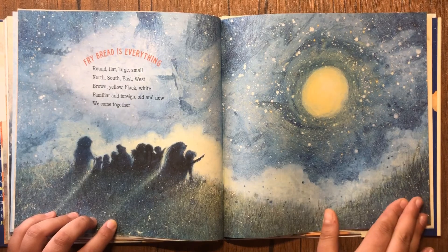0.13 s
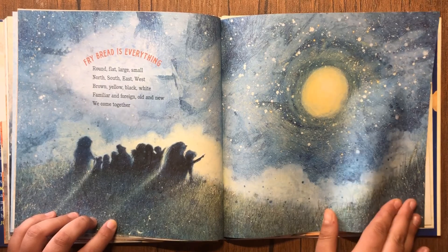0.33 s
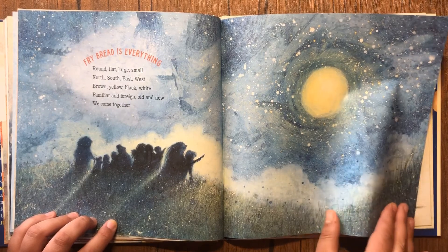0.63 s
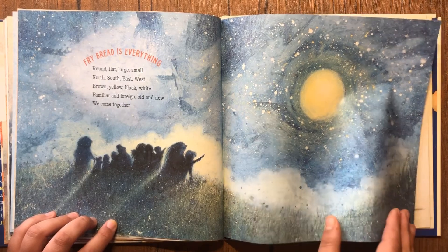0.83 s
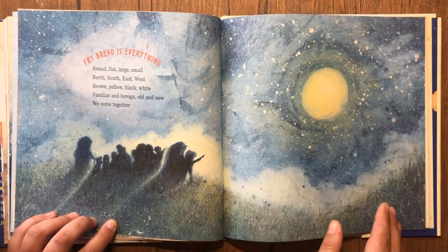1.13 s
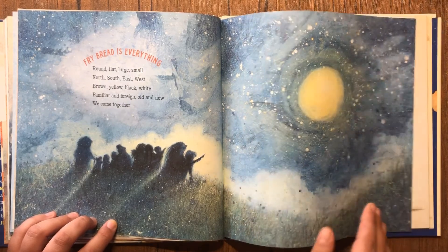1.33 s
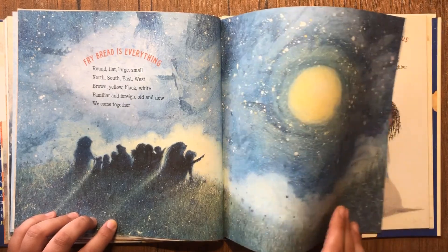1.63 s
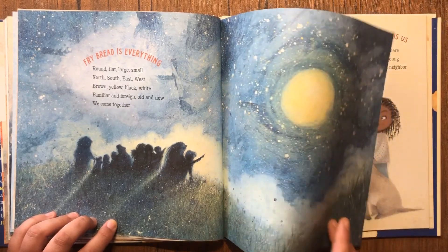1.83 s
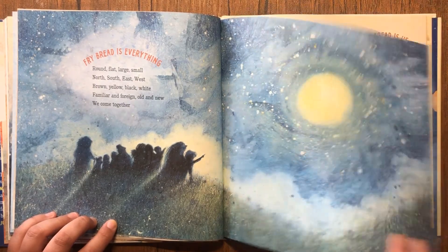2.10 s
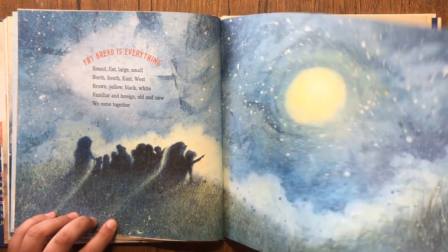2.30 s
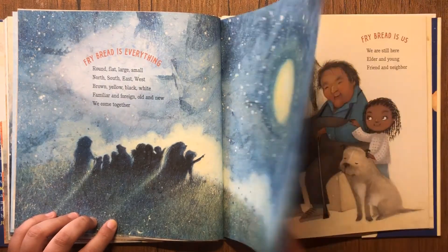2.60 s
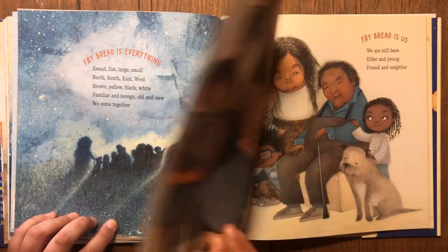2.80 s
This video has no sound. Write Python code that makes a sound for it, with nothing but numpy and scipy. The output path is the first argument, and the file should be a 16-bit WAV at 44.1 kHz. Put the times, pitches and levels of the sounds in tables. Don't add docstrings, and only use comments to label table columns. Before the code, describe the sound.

Paper page turning by hand: dry finger rubs, hollow pops, a long hiss, then crackly scrapes

```python
import sys
import numpy as np
from scipy import signal
from scipy.fft import rfft, irfft, next_fast_len
from scipy.io import wavfile
from scipy.ndimage import uniform_filter1d, map_coordinates

SR = 44100
rng = np.random.default_rng(int(sys.argv[2]) if len(sys.argv) > 2 else 0)


def output_pcm(signal):
    pcm = np.clip(np.atleast_2d(signal).T, -1, 1) * 32767
    wavfile.write(sys.argv[1], SR, np.round(pcm).astype(np.int16))


def voltage_ratio(decibels):
    exponent = np.asarray(decibels, float) / 20
    return 10 ** exponent


N = 130095


def unit(x):
    return x / np.sqrt(np.mean(x ** 2) + 1e-20)


def filtered(x, response):
    size = next_fast_len(len(x) + 4096)
    return irfft(rfft(x, size) * response(np.fft.rfftfreq(size, 1 / SR)), size)[:len(x)]


def colour(spectrum, rings):
    knot_hz, knot_db = np.transpose(spectrum)

    def response(hz):
        broad_db = np.interp(np.log(hz + 1), np.log(knot_hz + 1), knot_db)
        rings_db = sum(db / (1 + (2 * (hz - centre) / width) ** 2) for centre, width, db in rings)
        return voltage_ratio(broad_db + rings_db)
    return response


def peak(hz, width_hz):
    return lambda f: 1j * f * width_hz / (hz * hz - f * f + 1j * f * width_hz)


def wobble(rate, size):
    knots = rng.standard_normal(int(size * rate / SR) + 4)
    return map_coordinates(knots, [np.arange(size) * rate / SR])


def scratch(size, grit_db, catch_db):
    grains = rng.standard_normal(size)
    uneven_db = grit_db * np.minimum(rng.exponential(size=size), 5)
    clumps_db = catch_db * (wobble(250, size) + 1.92 * wobble(34.84, size))
    return grains * voltage_ratio(uneven_db + clumps_db)


# frequency in Hz, density in dB per Hz.
HUSH_SPECTRUM = [(15, -69), (25, -9.5), (120, -2.5), (256, -6.5), (545, -9), (641, -16), (10700, -33),
                 (12200, -28), (16000, -36)]
# centre in Hz, width in Hz, lift in dB.
HUSH_RINGS = [(86.3, 13, 10.5), (11700, 140, -10)]


def hush():
    noise = unit(filtered(rng.standard_normal(N), colour(HUSH_SPECTRUM, HUSH_RINGS)))
    return voltage_ratio(-56.5 + wobble(7.1, N)) * noise


def room(x):
    t60_s, delay_samples = 0.18, 200
    t = np.arange(SR // 3) / SR
    decaying = rng.standard_normal(len(t)) * voltage_ratio(-60 * t / t60_s)
    tail = filtered(decaying, lambda hz: 1 / (1 + hz / 3000))
    return signal.fftconvolve(np.pad(x, (delay_samples, 0)), tail / np.linalg.norm(tail))[:N]


# start in
# seconds, level in dB, pitch in Hz, swell in seconds, width as a share of pitch.
SHEET_BUCKLES = [(.974, -37.5, 635, 0.0062, 0.6), (.983, -24.5, 1265, 0.0034, 0.47),
                 (0.9892, -25.5, 1126, 0.0018, 0.6), (.996, -33.5, 746, 0.0041, 0.24),
                 (1.018, -43, 765, 0.0018, 0.35), (1.986, -33, 845, 0.0044, 0.28),
                 (2.55, -38.5, 790, 0.0065, 0.89), (2.561, -29.5, 607, .003, 0.29),
                 (2.561, -48, 1940, 0.003, 0.2), (2.607, -60.5, 2100, .008, 0.42),
                 (2.632, -33, 647, 0.0021, 0.57), (1.634, -37.5, 900, 0.0095, 0.67),
                 (1.971, -36, 656, 0.013, 0.82), (2.015, -52.5, 670, 0.027, 1),
                 (2.099, -39.5, 656, 0.011, 0.65), (2.154, -34.5, 750, 0.009, 0.55),
                 (2.179, -32, 715, 0.0068, 0.58), (2.2, -36, 584, 0.0075, 0.23),
                 (2.222, -37, 527, 0.01, 0.12), (2.321, -33.5, 680, 0.0086, 0.98),
                 (2.345, -43, 537, 0.014, 0.66), (2.566, -36, 660, 0.012, 1),
                 (2.603, -33.5, 840, 0.0065, 0.7), (2.635, -45.5, 740, 0.012, 0.84),
                 (2.665, -41, 615, 0.015, 0.7), (2.66, -54.5, 170, 0.045, 1), (.978, -43, 258, 0.0097, 1),
                 (.98, -52.5, 104, 0.014, 0.71), (1.64, -45, 550, 0.014, 0.44),
                 (1.972, -44, 383, 0.012, 0.66), (2.822, -50, 610, 0.0041, 0.28),
                 (1.34, -56, 126, 0.041, 1), (2.163, -44.5, 110, 0.0092, 0.6),
                 (2.339, -44.5, 213, 0.013, 0.22), (2.586, -42.5, 148, 0.014, 1)]


def buckles():
    thump_db, thump_ratio = -4, 0.67
    upper_db, upper_ratio = -13, 2.2
    out = np.zeros(N + SR)
    t = np.arange(SR // 2) / SR
    for s, db, hz, swell, width in SHEET_BUCKLES:
        swelling = 1.5 * t / swell
        puff = scratch(len(t), grit_db=2.0, catch_db=-0.5) * swelling ** 2 * np.exp(-swelling)

        def sheet(f):
            main = peak(hz, min(width, 0.95) * hz)(f) ** 2
            thump = voltage_ratio(thump_db) * width * peak(thump_ratio * hz, 0.6 * hz)(f) ** 2
            upper = voltage_ratio(upper_db) * width * peak(upper_ratio * hz, hz)(f) ** 2
            return main + thump - upper

        pop = filtered(puff, sheet)
        pop = pop * np.sqrt(2.85 * swell * SR) / np.linalg.norm(pop)
        out[round(s * SR):][:len(t)] += voltage_ratio(db) * pop
    return out[:N]


def strokes(rows, response, grit_db, attack_s):
    release_db_per_s, bright_top_hz = 900, 7750
    out = np.zeros(N + SR)
    t = np.arange(SR // 3) / SR
    for s, length, first_db, last_db, tilt_db in rows:
        def tilted(hz):
            octaves = np.log2(np.minimum(hz, bright_top_hz) / 4000 + 0.3)
            return response(hz) * voltage_ratio(tilt_db * octaves)

        noise = unit(filtered(scratch(len(t), grit_db, catch_db=0.6), tilted))
        level_db = np.interp(t, [0, length], [first_db, last_db])
        level_db = level_db - release_db_per_s * np.maximum(t - length, 0)
        onset = np.minimum(t / min(attack_s, 0.24 * length), 1) ** 2
        out[round(s * SR):][:len(t)] += noise * voltage_ratio(level_db) * onset
    return out[:N]


# start in seconds, length in seconds, first and last level in dB, brightness in dB per octave.
GRIP_STROKES = [(1.977, 0.011, -32, -42.5, -1), (2.0065, .004, -33, -45, -1), (2.011, 0.026, -28, -37.5, 3),
                (2.044, 0.058, -56, -61, -1), (2.101, 0.0061, -30, -42, -4), (2.108, 0.015, -34, -35, 2),
                (2.123, .02, -41.5, -39.5, -4), (2.143, 0.015, -39, -35, -4.5),
                (2.159, 0.031, -34, -36, -2.5), (2.195, 0.12, -42, -43.5, -2.5),
                (2.303, 0.014, -42, -39, -5.5), (2.325, 0.079, -46.5, -43.5, -6.5),
                (2.41, 0.09, -51, -45.5, -3.5), (2.508, 0.015, -41.5, -46.5, -0.5),
                (2.587, 0.0091, -31, -50, 1.5), (2.56, 0.055, -58, -57, -20),
                (2.64, 0.166, -55.5, -56.5, -2.5), (2.8, 0.041, -54, -67.5, -9)]
# frequency in Hz, density in dB per Hz.
RAISED_SPECTRUM = [(700, -9), (1200, -7), (2100, -5), (3500, -5.5), (5600, -6.5), (9000, -14),
                   (16000, -15.5)]


def grips():
    return strokes(GRIP_STROKES, colour(RAISED_SPECTRUM, []), grit_db=2.6, attack_s=0.003)


# start in seconds, length in seconds, first and last level in dB, brightness in dB per octave.
RUB_STROKES = [(.206, 0.092, -39, -41.5, -0.5), (.305, 0.069, -42, -51, -4), (.378, 0.19, -45, -43, -2.3),
               (.56, 0.11, -39.5, -56.5, -1.5), (.67, .11, -53.5, -43.5, -5),
               (.77, 0.073, -45.5, -48.5, -6), (.852, .008, -47, -48.5, -2),
               (.862, 0.023, -46.5, -54.5, -10.5), (.889, 0.046, -39.5, -58.5, -2),
               (.947, 0.02, -49, -36.5, -2), (.966, 0.014, -34, -45, 1), (.984, 0.013, -29, -45, -3.5),
               (1.004, .022, -41.5, -47.5, -1), (1.027, 0.012, -47, -48, -4),
               (1.044, 0.036, -35, -47, -0.5)]
# frequency in Hz, density in dB per Hz.
CORNER_SPECTRUM = [(290, -49), (500, -28), (819, -14.5), (974, -19), (2360, -3), (2730, -12), (5800, -11.5),
                   (11800, -21.5), (16000, -22.5)]
# centre in Hz, width in Hz, lift in dB.
CORNER_RINGS = [(2290, 540, -4.5), (3890, 240, 3), (5840, 150, 1.5), (7340, 180, 0), (11500, 780, 4)]


def rubs():
    return strokes(RUB_STROKES, colour(CORNER_SPECTRUM, CORNER_RINGS), grit_db=1.6, attack_s=0.019)


# time in seconds, pressure in dB, air pocket in Hz.
SLIDE_PATH = [(1.153, -55, 1373), (1.159, -39, 1372), (1.292, -38.5, 1237), (1.42, -37, 1046),
              (1.519, -35, 908), (1.602, -35.5, 863), (1.68, -38.5, 865), (1.8, -38.5, 856),
              (1.92, -39, 840), (1.966, -39.5, 845), (1.974, -42, 873)]
PAGE_RISES_S = [
    1.2,
    1.53,
    1.8,
]
# frequency in Hz, density in dB per Hz.
LOW_SPECTRUM = [(500, -23.5), (1000, -18), (1400, -5), (3000, -10.5), (5000, -8.5), (7000, -17),
                (16000, -32.5)]
HALF_SPECTRUM = [(290, -54), (500, -22), (880, -7), (1950, -10.5), (2570, -12.5), (3490, -1.5),
                 (12000, -20), (16000, -25)]
HIGH_SPECTRUM = [(290, -29), (500, -11.5), (1550, -9.5), (1690, -11.5), (1930, -8), (2810, -11.5),
                 (3810, -3.5), (16000, -17.5)]
# centre in Hz, width in Hz, lift in dB.
HALF_RINGS = [(2010, 71, 7.2), (3350, 250, 1.8), (3990, 140, 3), (5500, 390, 2.7), (7160, 220, 4.4),
              (11730, 600, 8.3)]
HIGH_RINGS = [(1950, 92, 3), (3500, 470, 4.2), (4950, 220, 4.1), (7360, 510, 3), (10500, 480, 4),
              (12000, 570, 4.6)]


def slide():
    t = np.arange(N) / SR
    s, pressure_db, pocket_hz = np.transpose(SLIDE_PATH)
    grains = scratch(N, grit_db=0.5, catch_db=0.56)
    shares = [np.interp(t, PAGE_RISES_S, row) for row in np.eye(len(PAGE_RISES_S))]
    gaps = [(LOW_SPECTRUM, []), (HALF_SPECTRUM, HALF_RINGS), (HIGH_SPECTRUM, HIGH_RINGS)]
    hiss = sum(share * unit(filtered(grains, colour(*gap))) for share, gap in zip(shares, gaps))

    flutter = filtered(rng.standard_normal(N), lambda hz: 1 / (1 + (hz / 110) ** 2))
    phase = 2 * np.pi * np.cumsum(np.interp(t, s, pocket_hz)) / SR
    pocket = unit(flutter * np.sin(phase))
    pocket_db = -11 - 32 * np.maximum(t - 1.4, 0)

    level_db = np.interp(t, s, pressure_db, left=-120) - 1500 * np.maximum(t - s[-1], 0)
    return voltage_ratio(level_db) * (hiss + voltage_ratio(pocket_db) * pocket)


# start in seconds, length in seconds, first and last pitch in Hz, lift in dB.
AIR_CHANNELS = [(.24, .13, 2250, 2350, 6), (.2, .08, 5600, 5400, 8), (.73, .11, 2050, 1650, 7),
                (.95, .04, 11200, 11000, 6), (.2, .075, 3250, 3100, 9), (.2, .05, 2200, 2200, -6),
                (.95, .035, 4400, 4100, 7), (.4, .14, 2350, 2250, 4), (1.13, .14, 2350, 2150, -7),
                (1.13, .14, 3400, 3250, -7), (1.13, .2, 4500, 4300, -6), (1.14, .07, 6100, 6000, 8),
                (1.24, .2, 3600, 3350, 6), (1.27, .2, 1650, 1450, -6), (1.35, .2, 2800, 2600, -6),
                (2.73, .03, 3300, 3000, 10), (2.15, .05, 5000, 5050, 8), (2.16, .035, 6450, 6400, 8),
                (2.18, .12, 3900, 3650, 7), (2.66, .025, 4700, 4200, 11), (2.39, .125, 3700, 3900, -11),
                (2.515, .03, 3550, 3500, 12), (2.005, .08, 5300, 5000, 6), (2.005, .05, 10700, 10300, 6),
                (1.04, .055, 6300, 5300, 8), (1.04, .05, 7900, 7600, 5), (2.005, .05, 3900, 3600, 8),
                (1.13, .13, 1750, 1620, 7), (1.13, .13, 2950, 2800, 12), (1.13, .2, 3900, 3750, 10),
                (1.13, .29, 5050, 4850, 7), (1.22, .16, 2500, 2150, 5), (2.103, .027, 7600, 7400, 11),
                (2.15, .27, 5050, 4800, 8), (2.15, .3, 11000, 9800, 8), (2.29, .13, 3400, 2850, 10),
                (2.39, .17, 2850, 2750, 14), (2.39, .15, 5200, 6100, 8), (2.675, .15, 5200, 6000, 8)]
# start in seconds, length in seconds, lower edge in Hz, loss in dB.
HAND_SHADES = [
    (1.0, .1, 8100, 10),
    (2, 0.032, 9800, 4),
    (1.15, 0.15, 6900, 4.5),
    (2.16, .3, 11300, 4.5),
]


def channels(x):
    spread_hz_s, width_share, patchy_db, shade_edge_hz = 20, 0.035, 1.5, 470
    hz, t, z = signal.stft(x, SR, nperseg=512, noverlap=384)
    hz, t = hz[:, None], t[None]
    patches = uniform_filter1d(rng.standard_normal(z.shape), size=5, axis=0)
    gain_db = patchy_db * unit(uniform_filter1d(patches, size=20, axis=1))
    for s, length, first_hz, last_hz, lift_db in AIR_CHANNELS:
        progress = np.clip((t - s) / length, 0, 1)
        centre = first_hz + (last_hz - first_hz) * progress
        width = spread_hz_s / length + width_share * centre
        swell = np.sqrt(np.sin(np.pi * progress) + 1e-9)
        gain_db = gain_db + lift_db * swell * np.exp(-(2 * (hz - centre) / width) ** 2)
    for s, length, above_hz, loss_db in HAND_SHADES:
        shaded = abs(t - s - length / 2) < length / 2
        gain_db = gain_db - loss_db * shaded * (0.5 + 0.5 * np.tanh((hz - above_hz) / shade_edge_hz))
    return signal.istft(z * voltage_ratio(gain_db), SR, nperseg=512, noverlap=384)[1][:N]


def scene():
    friction = rubs() + grips() + slide()
    page = channels(friction) + buckles()
    return (page + voltage_ratio(-15) * room(page) + hush())[None]


def roll_off(x):
    return signal.sosfilt(signal.butter(12, 16450, fs=SR, output="sos"), x)


def record(dry):
    def band(hz):
        return (hz < 15830) / (1 + (42 / (hz + 1)) ** 4)
    return roll_off(filtered(dry[0], band)[None])


dry = scene()
out = record(dry)
output_pcm(out)
```